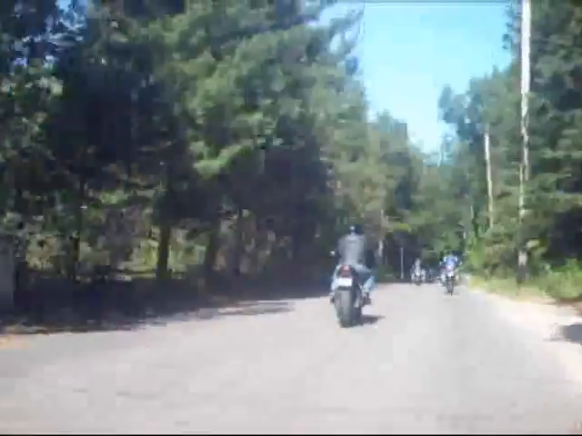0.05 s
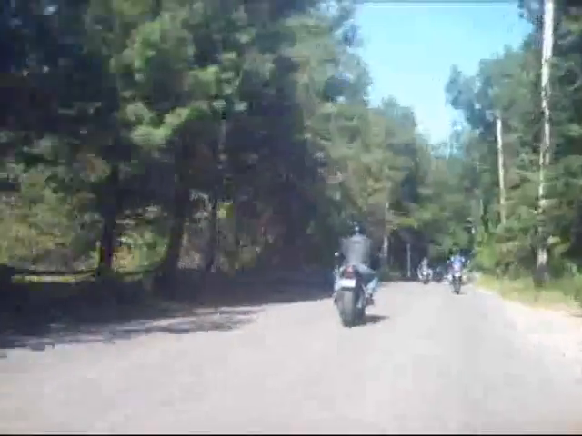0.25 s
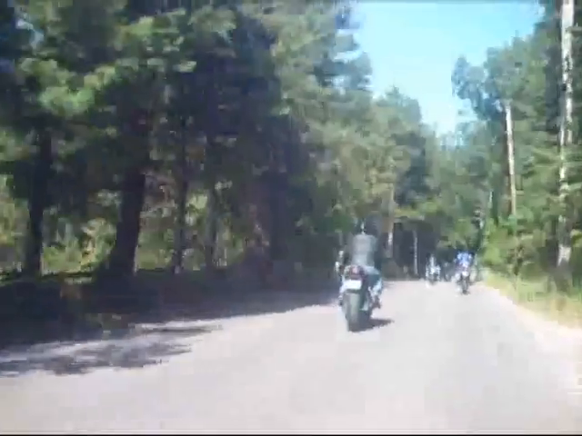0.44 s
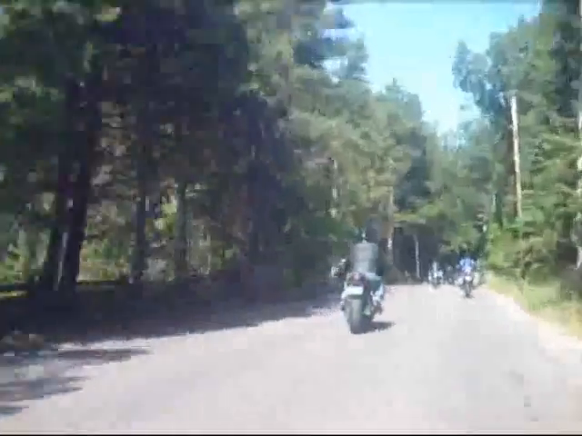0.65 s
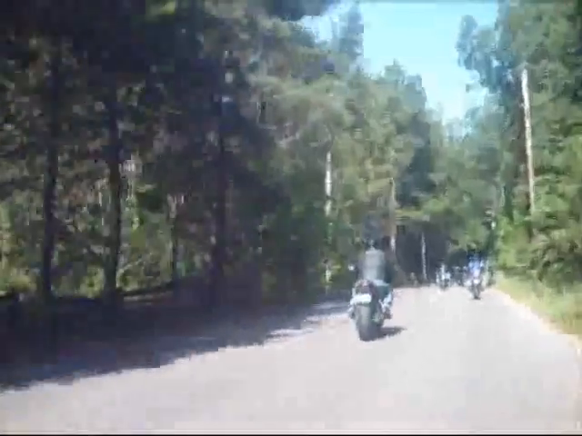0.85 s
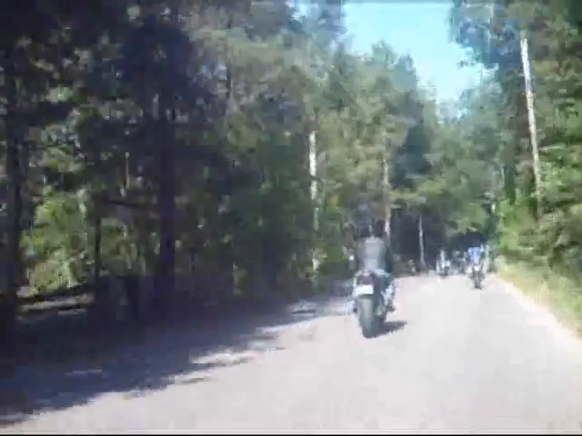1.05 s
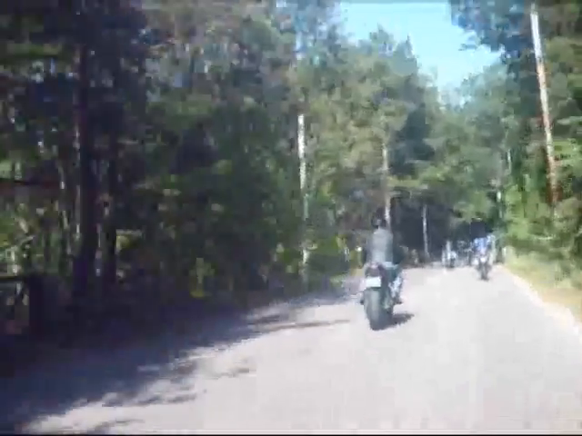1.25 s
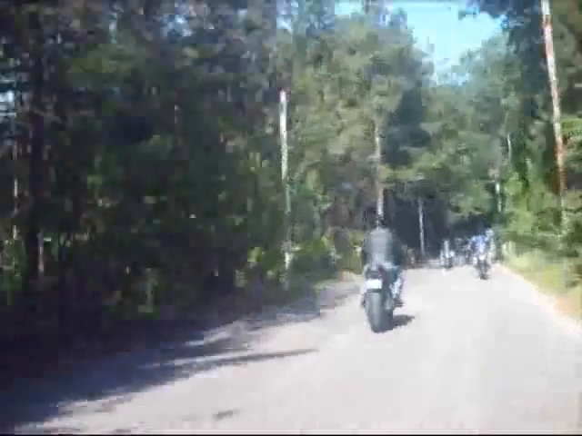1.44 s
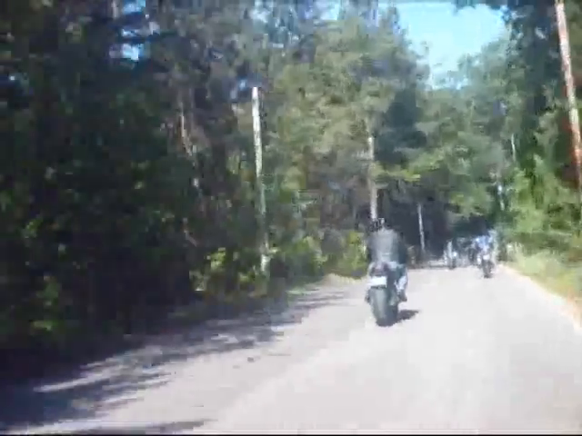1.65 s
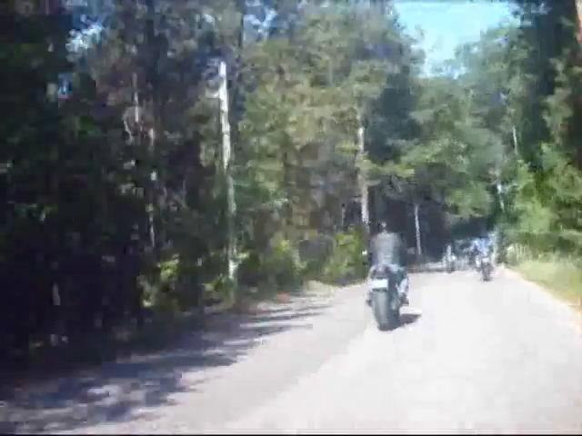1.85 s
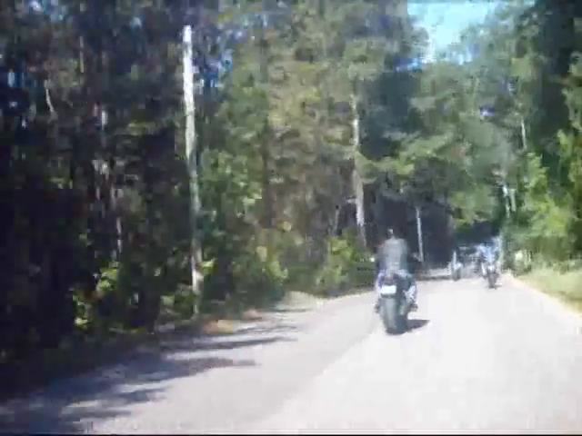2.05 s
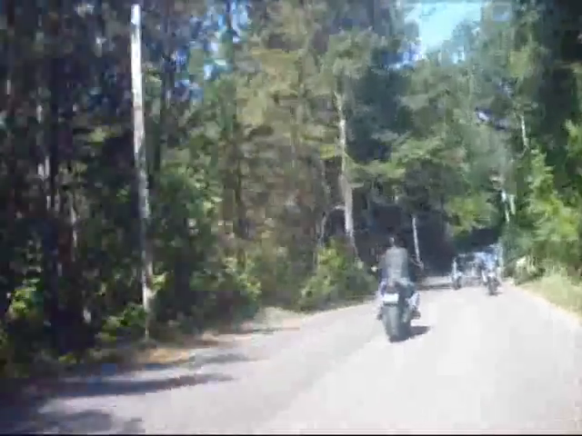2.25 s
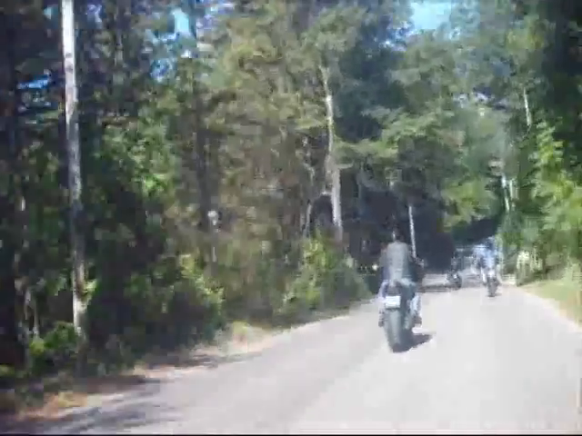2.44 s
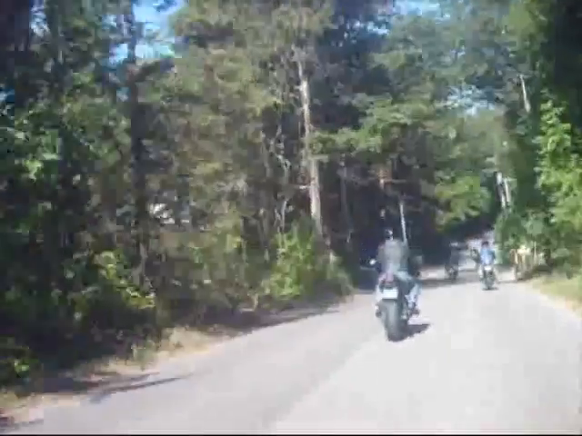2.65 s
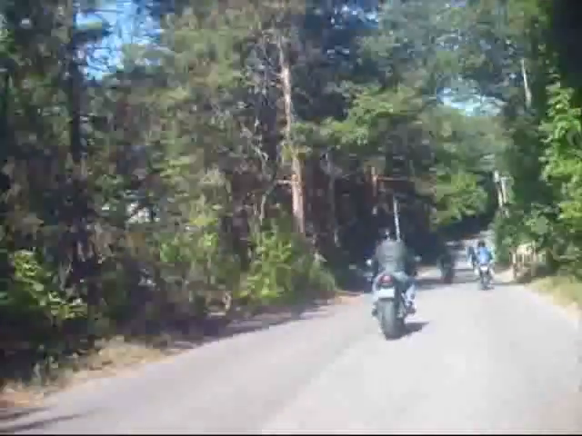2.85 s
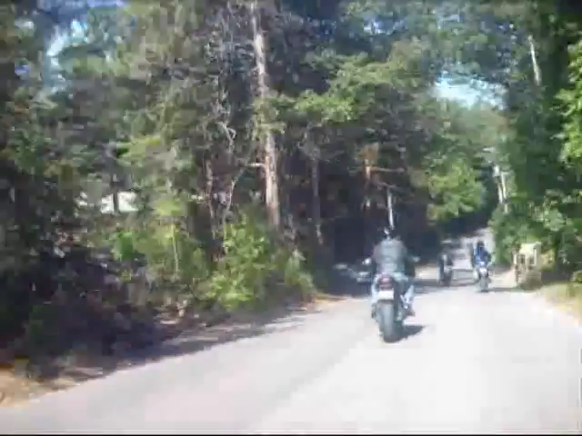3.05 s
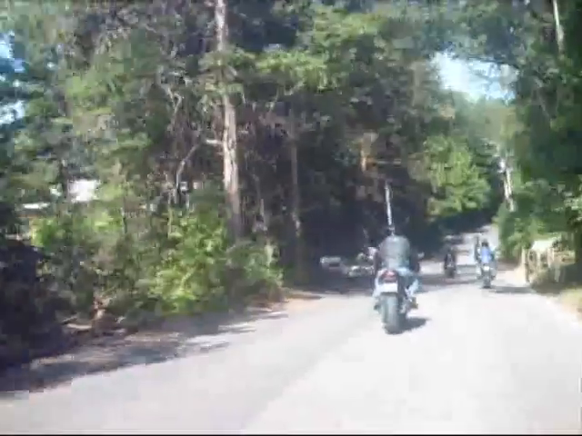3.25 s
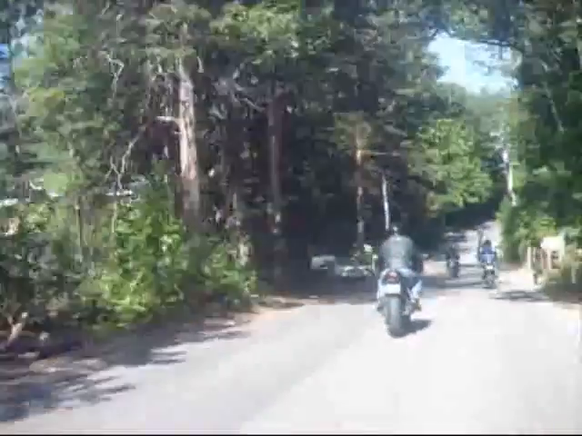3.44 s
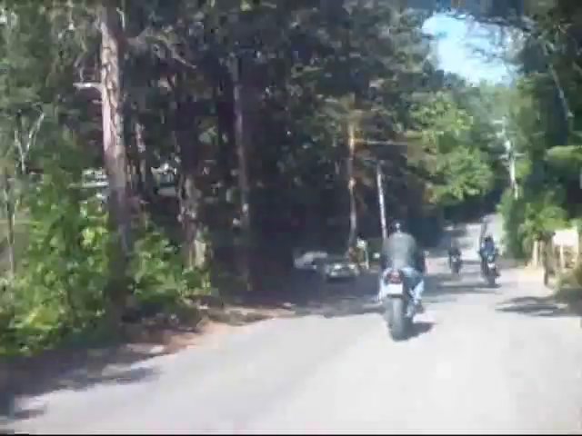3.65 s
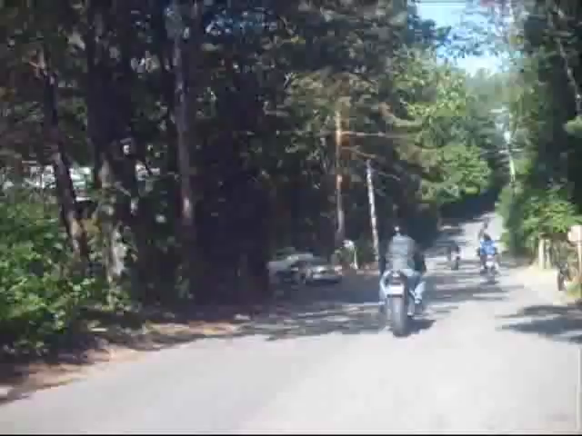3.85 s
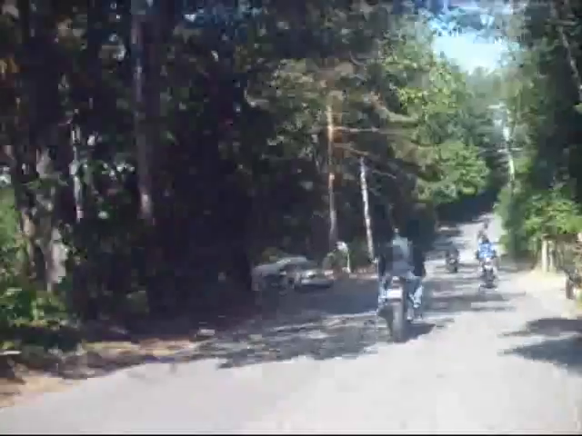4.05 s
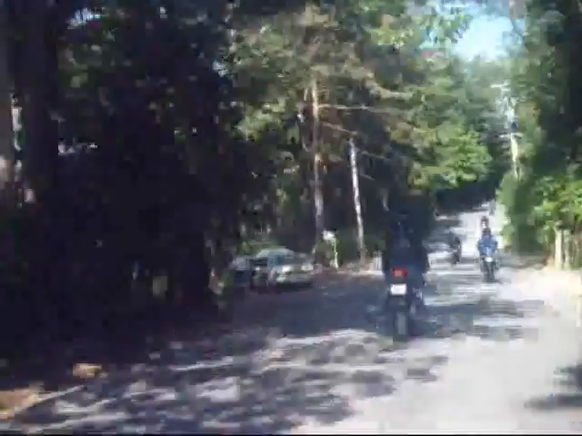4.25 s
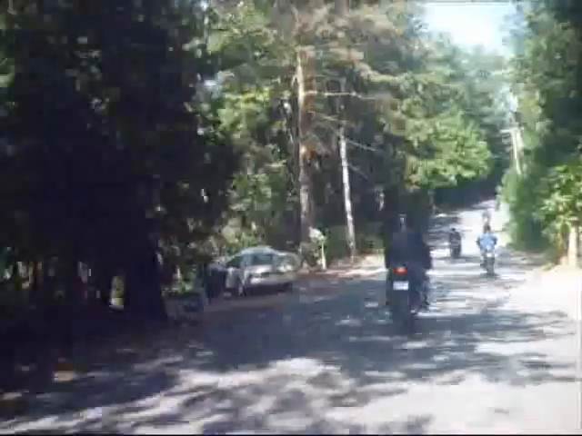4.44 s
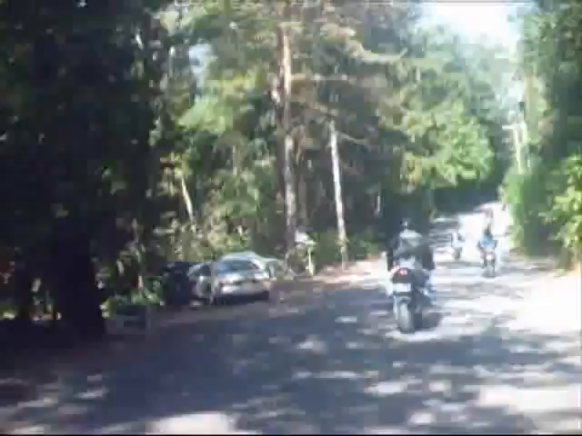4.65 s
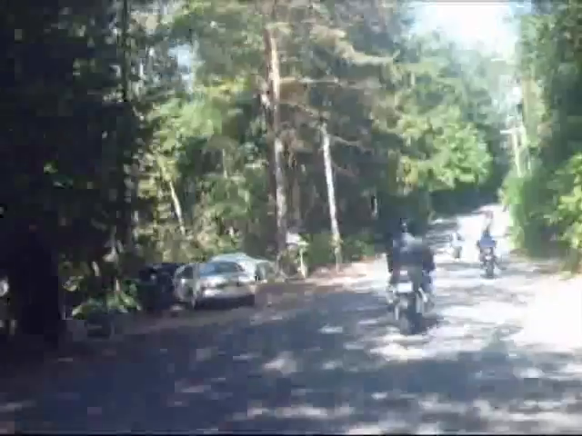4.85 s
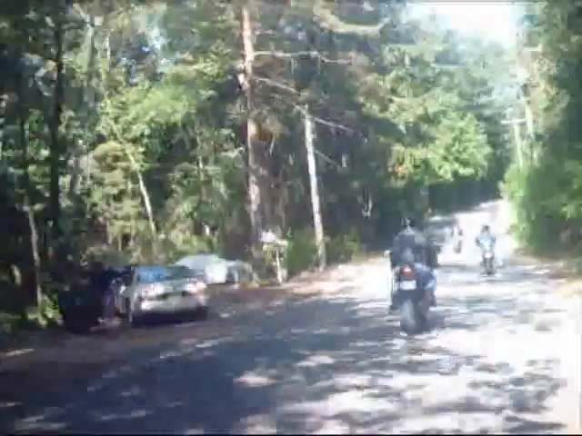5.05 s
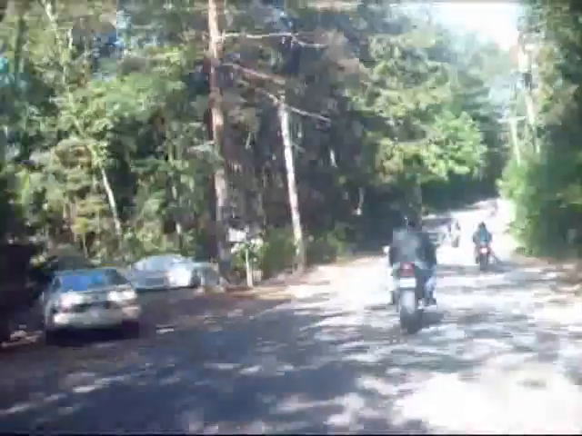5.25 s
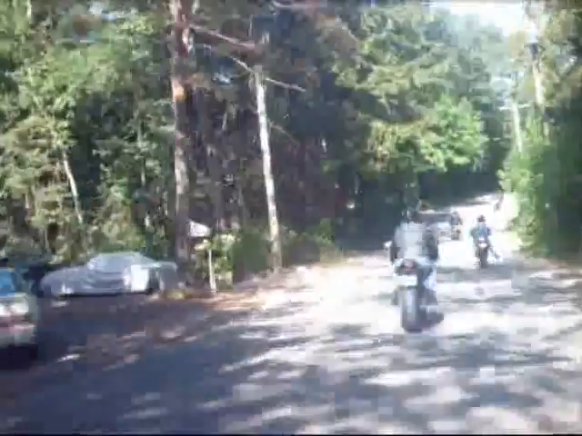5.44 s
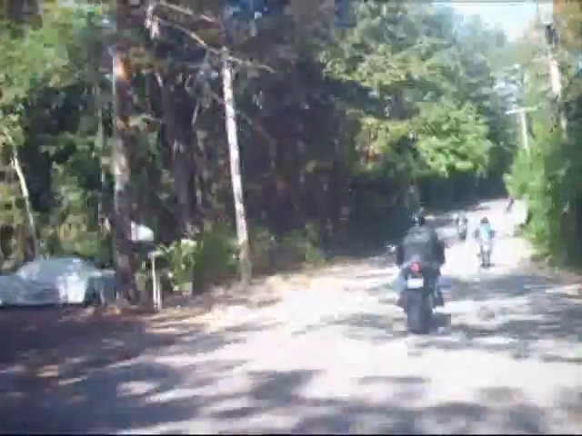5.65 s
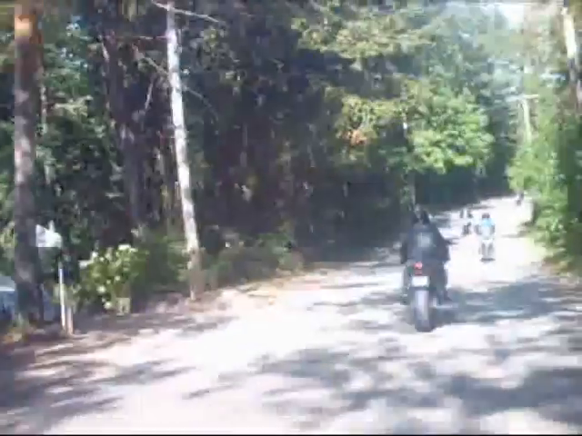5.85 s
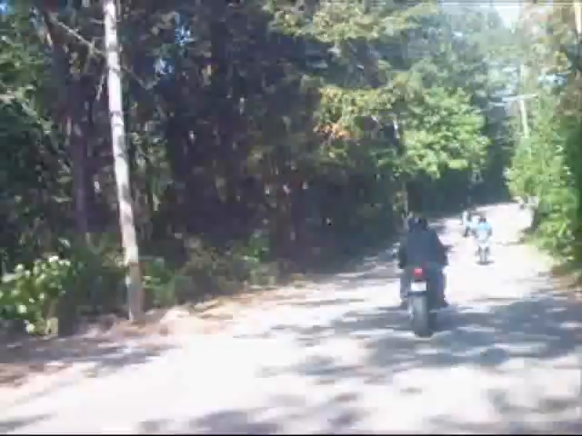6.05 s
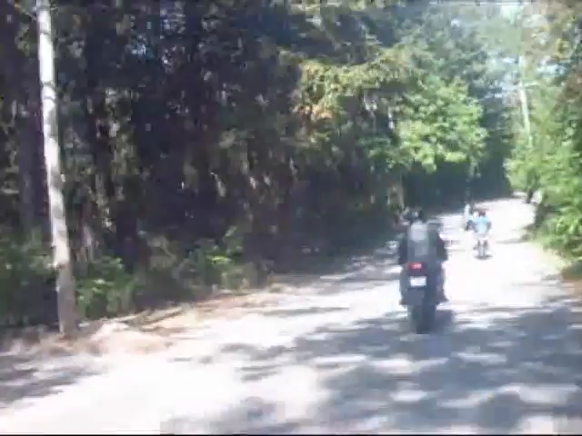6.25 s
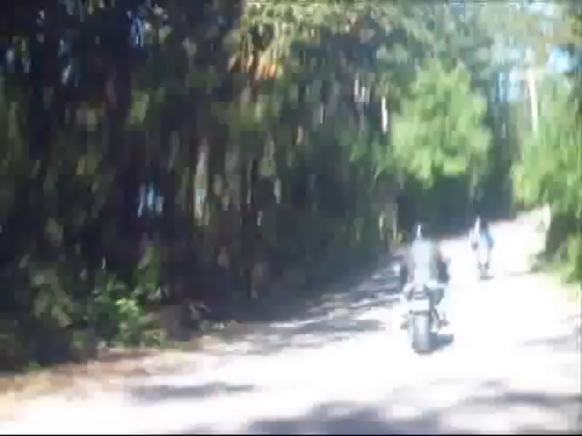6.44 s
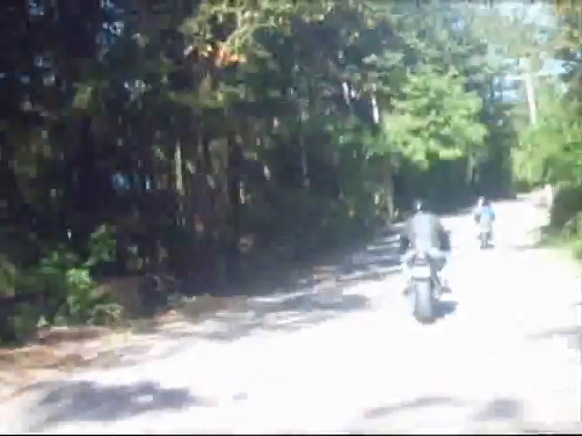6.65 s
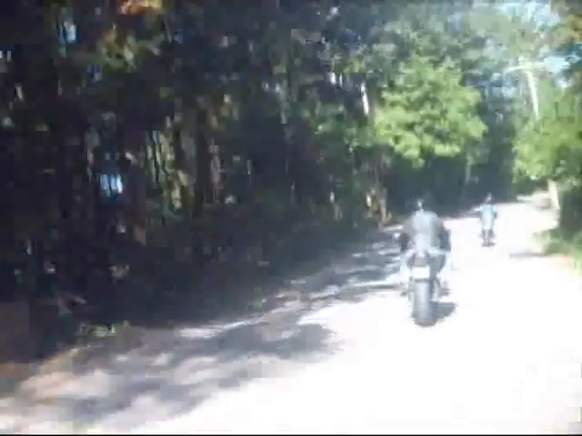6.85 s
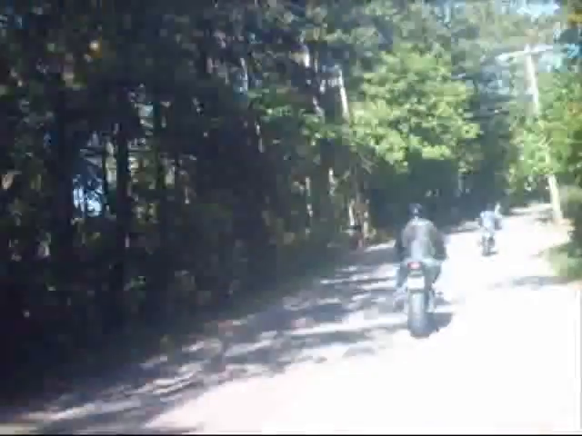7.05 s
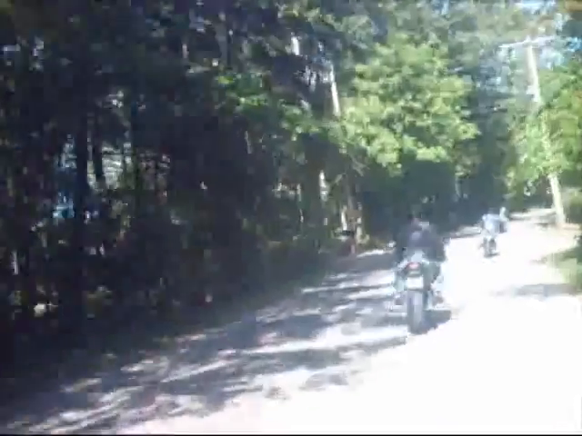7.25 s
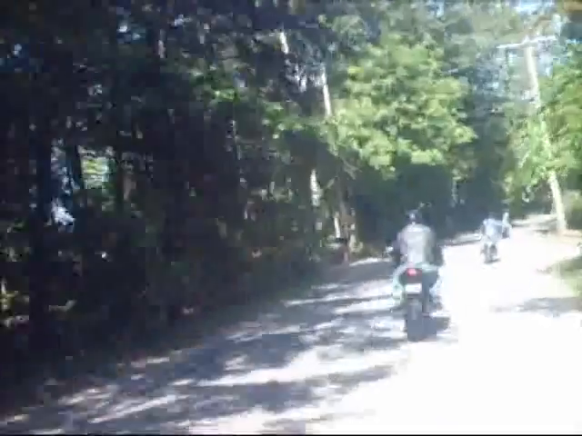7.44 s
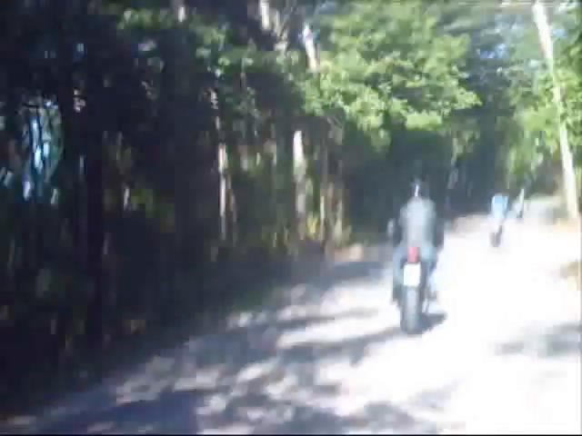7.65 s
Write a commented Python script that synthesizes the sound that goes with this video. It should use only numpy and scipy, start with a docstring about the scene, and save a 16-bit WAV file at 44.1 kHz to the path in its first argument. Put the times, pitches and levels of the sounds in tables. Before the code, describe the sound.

A motorcycle engine hums steadily over wind and tyre roar, with irregular knocks and rattles close by.

```python
"""Motorcycle on a wooded road

A motorcycle cruises along, slowing slightly, heard from a small camera mounted on it. The exhaust hums
over a bed of wind and tyre roar, and throbs towards the end. The uneven road sets the mount swaying and
knocking in its play; the jolts also swell the rumble and the hum, while the engine buzzes loose parts.
The camera holds each sample at a low rate, which mirrors the sound into a gritty treble."""
import sys
import numpy as np
from scipy import signal
from scipy.fft import rfft, irfft
from scipy.io import wavfile

SR = 44100
rng = np.random.default_rng(int(sys.argv[2]) if len(sys.argv) > 2 else 0)


def output_pcm(signal):
    """Save a mono or channel-first signal as 16-bit PCM at the path in sys.argv[1].

    Samples are clipped to [-1, 1] before scaling.
    """
    pcm = np.clip(np.atleast_2d(signal).T, -1, 1) * 32767
    wavfile.write(sys.argv[1], SR, np.round(pcm).astype(np.int16))


N = 340011

# Tone colour of the wind and tyre bed: frequency_hz, relative_db
ROAR_COLOUR = [(20, 12), (56, -3.5), (76, 7), (100, -13), (190, -8), (260, -1), (420, -5.5), (520, -8),
               (700, -6), (850, -14), (1100, -18.5), (1350, -24), (1550, -28.5), (3500, -15.5)]
# Road roughness, as the steady sway it gives the mount: time_s, sway_db
ROAD_ROUGHNESS = [(0, -44), (2.55, -36.5), (2.75, -47), (6.2, -47), (7.71, -41)]
# Soft bumps that rock the mount without a knock: centre_s, sway_db, half_length_s
SOFT_BUMPS = [(0.45, -37, .06), (0.847, -30, 0.054), (1.859, -42, .03), (2.43, -37, .07),
              (3.59, -35, 0.034), (4.39, -31, 0.034), (4.69, -34, 0.055), (5.53, -39, 0.073),
              (6.581, -27.5, 0.062), (6.839, -33, 0.096)]
# Ringing modes of the camera's plastic housing: pitch_hz, width_hz, gain_db
HOUSING_MODES = [(323, 83, -12), (610, 120, -9), (694, 148, 4), (960, 130, -5.5), (1268, 126, -1),
                 (1812, 320, -3.5), (2045, 270, -7), (2410, 360, -6.5), (2716, 380, -4), (3020, 130, -3.5)]
# Knocks of the mount, each a dull body and a bright crack, before mix trims: hit_s, body_db, crack_db
MOUNT_KNOCKS = [(0.006, -35, -43), (0.0266, -28, -33), (0.0759, -26, -30), (0.1976, -38, -42),
                (0.3634, -35, -41), (0.7881, -45, -31), (0.8059, -30, -40), (0.8929, -45, -32),
                (1.2239, -28, -31), (1.241, -30, -41), (1.3864, -33, -38), (1.5238, -40, -41),
                (1.645, -43, -29), (1.6673, -28, -35), (1.7494, -43, -37), (1.8235, -41, -27),
                (1.8465, -33, -48), (2.0343, -44, -33), (2.0551, -30, -35), (2.3311, -38, -36),
                (2.5171, -33, -36), (2.5337, -33, -44), (2.5872, -30, -35), (2.7479, -45, -31),
                (2.9581, -36, -41), (3.1766, -37, -43), (3.5365, -36, -37), (3.676, -46, -33),
                (3.9943, -42, -41), (4.3533, -46, -37), (4.7646, -50, -36), (5.1346, -49, -35),
                (5.7827, -45, -31), (6.0018, -41, -38), (6.4702, -24, -19), (6.5179, -28, -30),
                (6.5997, -34, -43), (7.0968, -43, -29), (7.3453, -46, -33), (7.3729, -35, -47),
                (7.5865, -28, -30), (7.6218, -30, -34), (7.6454, -34, -41)]
# Engine speed, easing off: time_s, crankshaft_hz
ENGINE_SPEED = [(0, 71.98), (0.6, 70.8), (1, 71.04), (1.4, 70.2), (1.8, 70.66), (2.8, 70.78), (4.3, 69.85),
                (4.8, 70.12), (5.8, 69.1), (6.3, 69.08), (6.8, 68.1), (7.71, 67.55)]
# Partials of the exhaust hum: crankshaft_multiple, relative_db, waver_db
EXHAUST_PARTIALS = [(1, -16.5, 6.5), (2, 0.5, 2), (3, -28, 9), (4, -9.5, 2.5), (5, -37.5, 11), (6, -9, 3.5),
                    (7, -31, 5)]
# Throttle, as a lift or cut on the upper exhaust partials: time_s, gain_db
THROTTLE_BRIGHTNESS = [(0, 0), (2.5, 1.5), (4.9, 2), (6.0, 0.5), (6.9, -1.5), (7.3, -5.5), (7.71, -5)]
# Throb of the strongest exhaust partial: time_s, depth_fraction
THROB_DEPTH = [(4.6, 0.031), (6.1, 0.54), (7.7, .38)]

EVEN_ROAD_DB = -42.5  # sway that counts as no extra shaking
JOLT_RISE_S, JOLT_DECAY_S, JOLT_DB = 0.025, 0.05, -1.5  # sway around a knock; level against its body
SWAY_HZ, SWAY_TRIM_DB = 25.1, -2.1
THUD_DB, THUD_PER_SHAKE = -54.5, 0.85  # level on an even road; dB gained per dB of shaking
CHATTER_PER_S, CHATTER_DB, CHATTER_DB_PER_HZ, CRUISE_HZ = 1700, -57, 1.13, 70  # louder at higher revs
TICKS_PER_S, TICK_DB, TICK_SPREAD_DB = 4.3, -42.5, 5
LEAD_S = 0.006  # soft lead-in before each hit
HUM_GAIN_DB, HUM_PER_SHAKE = -41, 0.12  # gain on an even road; dB gained per dB of shaking
THROB_HZ, THROB_DIP_S = 3.76, 6.25  # rate of the throb; time of one of its dips
CLOCK_HZ, FRAME_HZ, SLIP_CYCLES, TOP_HZ = 8000, 29.8, 0.42, 12800


def undb(db):
    """Decibels to gain."""
    return 10 ** (np.asarray(db) / 20)


def unit(x):
    """Scale to rms 1."""
    return x / np.sqrt(np.mean(x ** 2))


def curve(rows):
    """An automation lane: rows of time_s, value joined by straight lines."""
    return np.interp(np.arange(N) / SR, *np.transpose(rows))


def drift(rate_hz):
    """Smooth random modulation of rms 1, moving at up to about rate_hz."""
    hz = np.arange(N // 2 + 1) * SR / N
    return unit(irfft(rfft(rng.standard_normal(N)) / (1 + (hz / rate_hz) ** 4), N))


def noise(colour):
    """Noise of rms 1, shaped by rows of frequency_hz, relative_db and rolled off at both ends."""
    hz, db = np.transpose(colour)
    bins = np.arange(1, N // 2 + 2) * SR / N
    gain = undb(np.interp(np.log(bins), np.log(hz), db))
    gain = gain / (1 + (hz[0] / bins) ** 4) / (1 + (bins / hz[-1]) ** 4)
    return unit(irfft(rfft(rng.standard_normal(N)) * gain, N))


def butter(x, hz, kind, order):
    """Butterworth low-pass or high-pass."""
    return signal.sosfilt(signal.butter(order, hz, kind, fs=SR, output="sos"), x)


def place(out, start_s, sound, peak_db):
    """Drop a one-shot into the mix at the given peak level."""
    i = max(int(start_s * SR), 0)
    out[i:i + len(sound)] += (sound * undb(peak_db) / np.abs(sound).max())[:N - i]


def roar(shake_db):
    """The wind and tyre bed, a little louder on rough road; small eddies make its top flutter."""
    low = butter(noise(ROAR_COLOUR), 256, "low", order=2) * undb(0.31 * drift(6.7))
    high = butter(noise(ROAR_COLOUR), 230, "high", order=2) * undb(1.37 * drift(30))
    return (low + high) * undb(-43.5 + 0.063 * shake_db)


def shaking():
    """How hard the mount sways, in dB: road surface, soft bumps and a dying jolt at each mount knock."""
    t = np.arange(N) / SR
    power = undb(curve(ROAD_ROUGHNESS)) ** 2
    for centre_s, sway_db, half_length_s in SOFT_BUMPS:
        power += undb(sway_db) ** 2 * np.exp(-np.minimum(((t - centre_s) / half_length_s) ** 2, 20))
    lead = SR // 10
    since_s = np.arange(-lead, SR // 2) / SR
    jolt = np.exp(np.minimum(since_s / JOLT_RISE_S, -since_s / JOLT_DECAY_S))
    kicks = np.zeros(N)
    for hit_s, body_db, _ in MOUNT_KNOCKS:
        kicks[int(hit_s * SR)] = undb(body_db + JOLT_DB)
    power += signal.fftconvolve(kicks ** 2, jolt ** 2)[lead:lead + N]
    return 10 * np.log10(power)


def sway(shake_db):
    """The low end: the mount bounces on its spring at an unsteady rate, and hard jolts thud."""
    phase = 2 * np.pi * np.cumsum(SWAY_HZ * np.exp(0.1467 * drift(12.2))) / SR
    bounce_db = EVEN_ROAD_DB + shake_db + SWAY_TRIM_DB + 1.4 * drift(10)
    bounce = np.sqrt(2) * np.sin(phase) * undb(bounce_db)
    thud = noise([(35, -3), (80, 5.0), (160, 1.5), (300, -9), (600, -20)])
    return bounce + thud * undb(THUD_DB + THUD_PER_SHAKE * shake_db)


def housing(force):
    """The plastic shell rings briefly in its modes."""
    return sum(undb(gain_db) * signal.lfilter(*signal.iirpeak(hz, hz / width_hz, fs=SR), force)
               for hz, width_hz, gain_db in HOUSING_MODES)


def chatter(turns, shake_db):
    """The engine buzzes loose parts: tiny contacts bunched at each firing, more ragged on rough road."""
    contacts_per_s = CHATTER_PER_S * (1 + 0.3 * np.cos(4 * np.pi * turns))
    size_db = (4.0 + 0.032 * shake_db) * np.minimum(rng.exponential(size=N), 5)
    hits = rng.random(N) < contacts_per_s / SR
    force = hits * undb(size_db) * rng.choice([-1, 1], N)
    buzz = unit(butter(housing(force), 1160, "high", order=2))
    return buzz * undb(CHATTER_DB + CHATTER_DB_PER_HZ * (curve(ENGINE_SPEED) - CRUISE_HZ))


def stray_ticks():
    """Light contacts at random moments, as rows of hit_s, body_db, crack_db."""
    when, strength = rng.random((int(TICKS_PER_S * N / SR), 2)).T
    level_db = TICK_DB + TICK_SPREAD_DB * (2 * strength - 1)
    return list(zip(when * N / SR, level_db, level_db))


def contact(burst, burst_s, halo, halo_s):
    """A faint noise swells into a sharp click and fades; the housing rings."""
    t = np.arange(SR // 20) / SR - LEAD_S
    envelope = burst * np.exp(-np.abs(t) / burst_s) + halo * np.exp(-np.abs(t - halo_s / 2) / halo_s)
    force = envelope * rng.standard_normal(len(t))
    force[int(LEAD_S * SR)] += 1  # the hit itself
    return housing(force)


def thump(push_s):
    """The whole camera is stopped and thrown back: one slow swing of pressure."""
    t = np.arange(SR // 20) / SR / push_s
    return t * (t - 2) * np.exp(-t)


def knocks():
    """Heavy blows thump and ring the housing's low modes; light, hard contacts crack in the high ones."""
    out = np.zeros(N)
    for hit_s, body_db, crack_db in MOUNT_KNOCKS + stray_ticks():
        start_s = hit_s - LEAD_S
        ring = contact(burst=0.19, burst_s=0.00073, halo=0.036, halo_s=0.0032)
        place(out, start_s, butter(ring, 884, "low", order=3), body_db + 1)
        place(out, start_s, butter(ring, 1620, "high", order=3), crack_db + 4)
        place(out, start_s, thump(push_s=0.0025), body_db - 4)
    return out


def exhaust(turns, shake_db):
    """The hum: partials at multiples of the crankshaft rate, each wavering in the air stream."""
    t = np.arange(N) / SR
    throttle_db = curve(THROTTLE_BRIGHTNESS)
    throb = 1 - curve(THROB_DEPTH) * np.cos(2 * np.pi * THROB_HZ * (t - THROB_DIP_S))
    flutter = drift(31)  # shifts the arrival time, so high partials smear most
    hum = np.zeros(N)
    for multiple, db, waver_db in EXHAUST_PARTIALS:
        phase = 2 * np.pi * (multiple * turns + rng.random()) + 0.056 * multiple * flutter
        partial = np.sin(phase) * undb(db + waver_db * drift(26.4) + throttle_db * (multiple > 4))
        hum += partial * throb if multiple == 2 else partial  # two firings a turn: the strongest partial
    return np.sqrt(2) * hum * undb(HUM_GAIN_DB + HUM_PER_SHAKE * shake_db)


def scene():
    """The mono mix at the microphone: engine, air and the rattling mount."""
    turns = np.cumsum(curve(ENGINE_SPEED)) / SR
    shake_db = shaking() - EVEN_ROAD_DB
    mix = exhaust(turns, shake_db) + roar(shake_db) + sway(shake_db) + chatter(turns, shake_db) + knocks()
    return mix[None]


def record(dry):
    """Lo-fi grit: a telephone-band input, sampled and held by a clock that slips at every picture frame."""
    t = np.arange(N) / SR
    hiss = undb(-64) * rng.standard_normal(N)
    narrow = butter(dry[0], 3300, "low", order=8) + hiss
    clock = CLOCK_HZ * t + SLIP_CYCLES * np.floor(FRAME_HZ * t)
    held = np.interp(t - clock % 1 / CLOCK_HZ, t, narrow)  # steps mirror the sound around the clock rate
    top_cut = signal.ellip(10, 0.2, 80, TOP_HZ, fs=SR, output="sos")
    return signal.sosfilt(top_cut, held)[None]


dry = scene()
out = record(dry)
output_pcm(out)
```